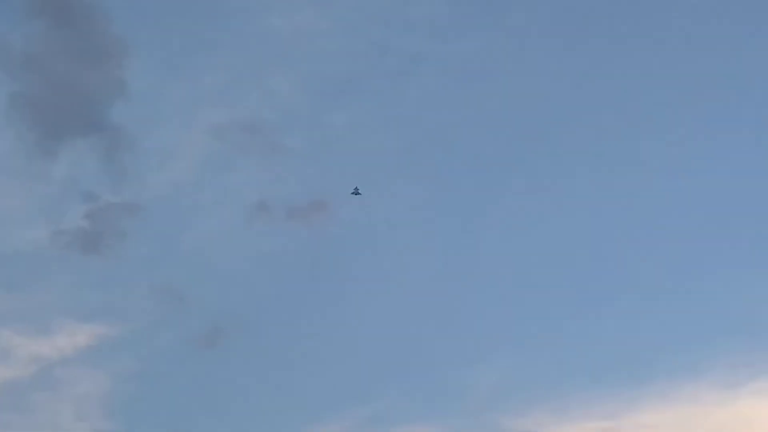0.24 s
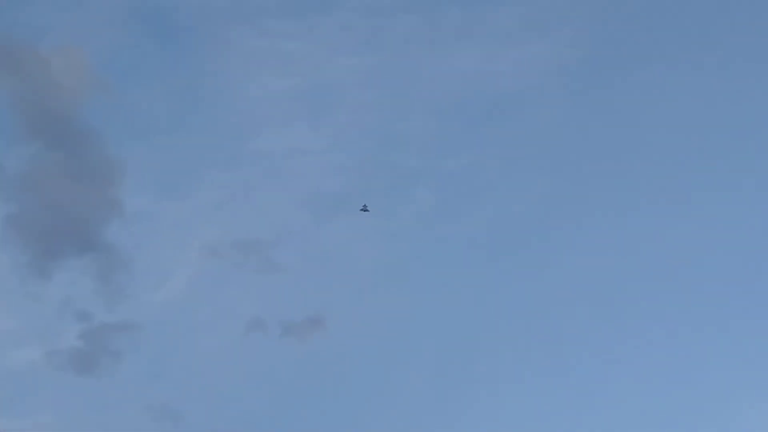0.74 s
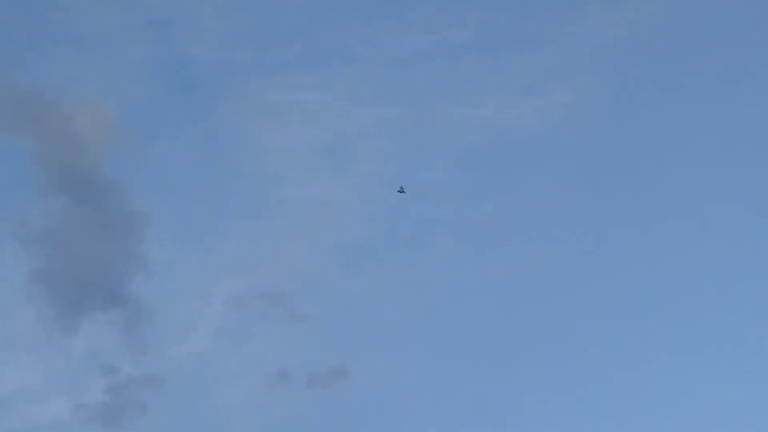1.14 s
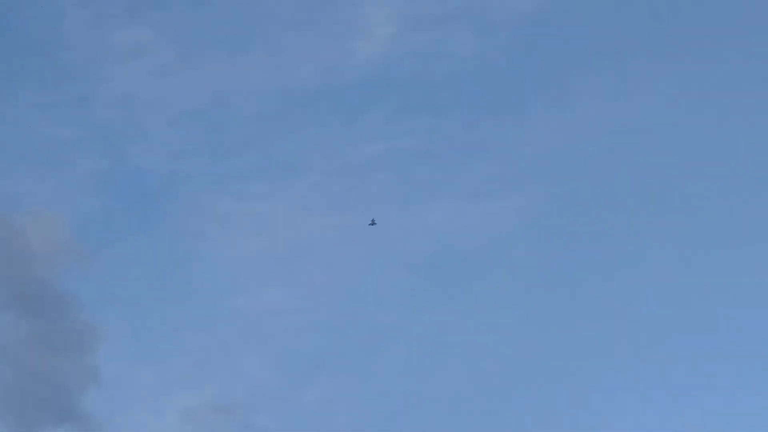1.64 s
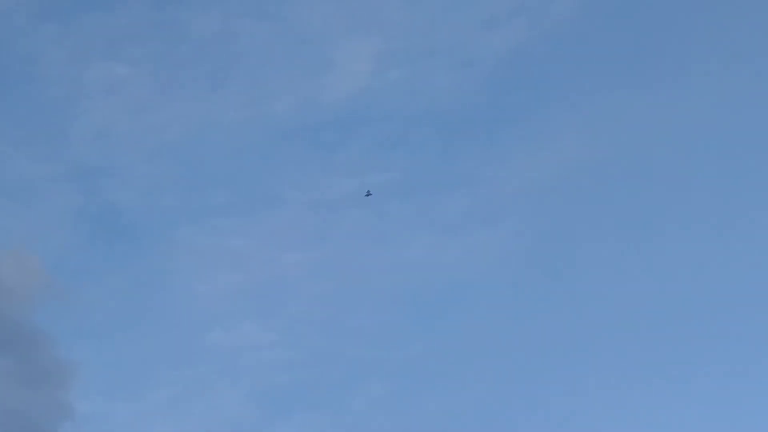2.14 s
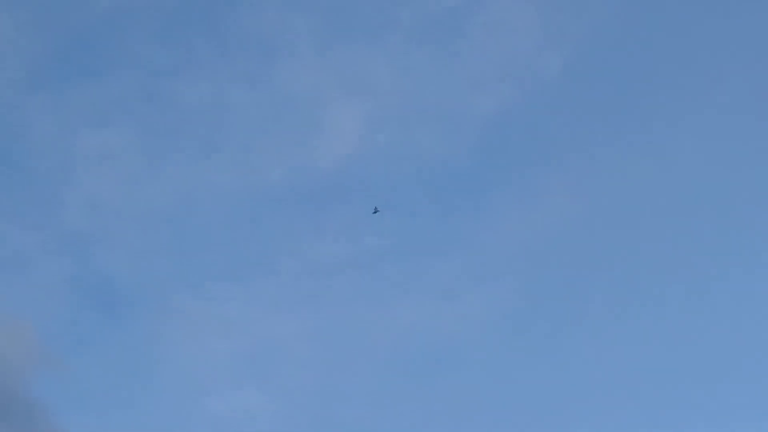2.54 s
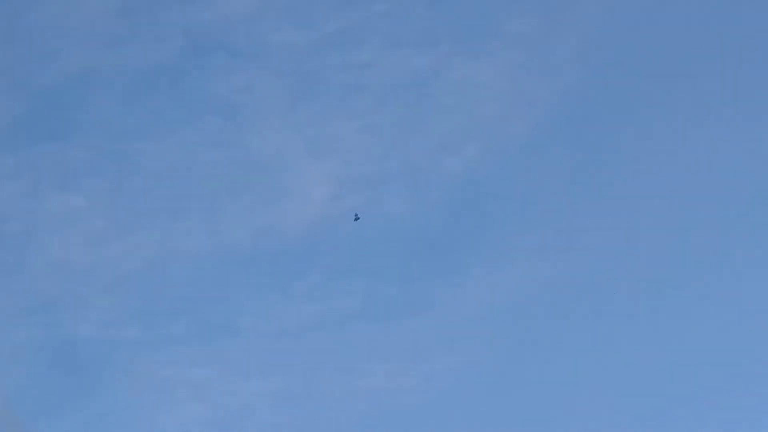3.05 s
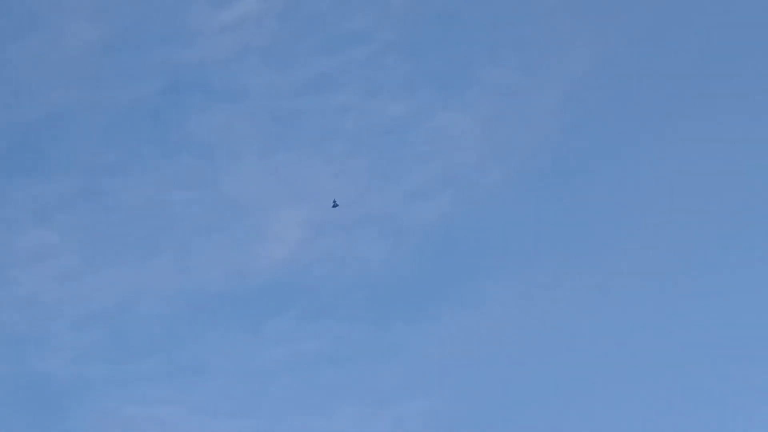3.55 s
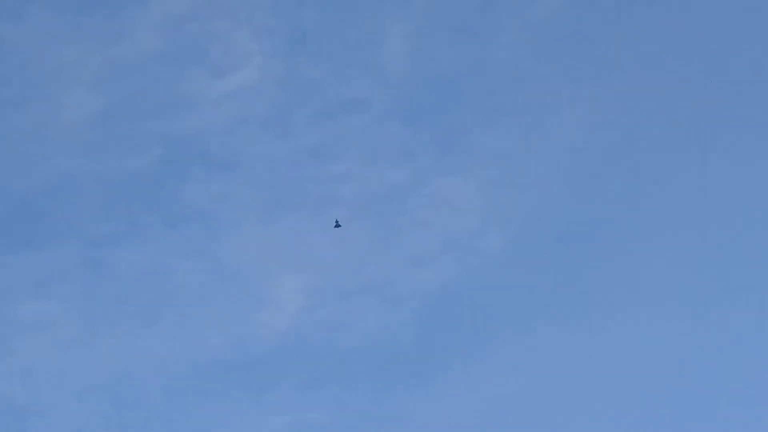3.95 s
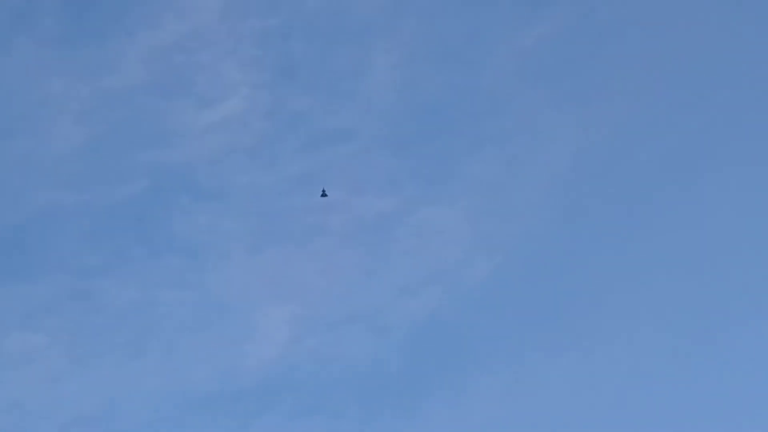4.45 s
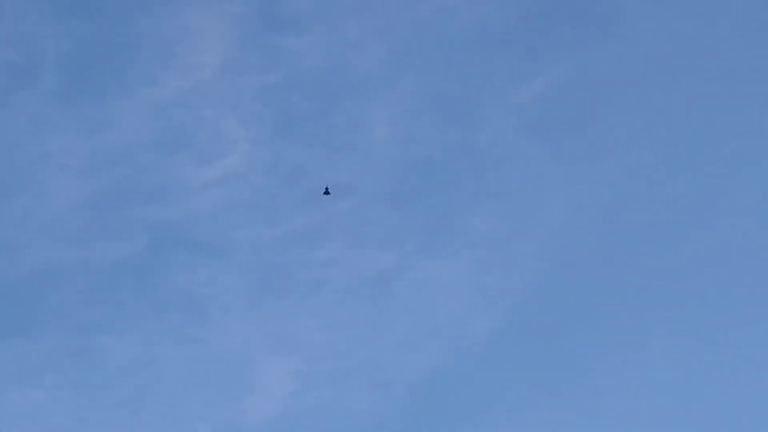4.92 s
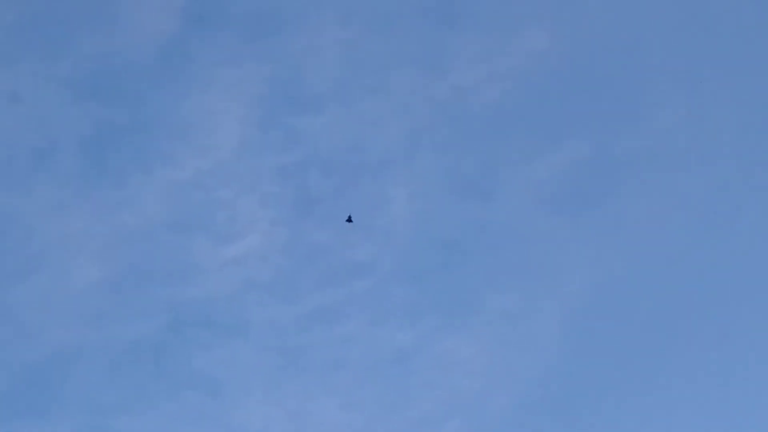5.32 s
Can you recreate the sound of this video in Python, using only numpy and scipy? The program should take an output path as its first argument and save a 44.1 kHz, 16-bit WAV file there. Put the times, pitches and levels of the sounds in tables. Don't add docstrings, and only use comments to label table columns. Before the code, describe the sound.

An electric ducted-fan model jet flies over an open field, heard from a ground camera in wide stereo. Bright hissing air and a steady whine come first; the tone thins midway, then sings out stronger and slightly higher as the hiss dulls. Wind rumbles throughout and thumps the microphone late, hardest at the end.

```python
import sys
import numpy as np
from scipy import signal
from scipy.fft import rfft, irfft, next_fast_len
from scipy.io import wavfile
from scipy.ndimage import uniform_filter1d, map_coordinates

SR = 44100
rng = np.random.default_rng(int(sys.argv[2]) if len(sys.argv) > 2 else 0)


def boost(x):
    u = np.asarray(x, float) / 20
    return 10 ** u


def bounce(signal):
    frames = np.transpose(np.atleast_2d(signal))
    limited = np.clip(frames, -1, 1)
    pcm = np.round(limited * 32767).astype(np.int16)
    wavfile.write(sys.argv[1], SR, pcm)


N = 245981


def unit(x):
    return x / np.sqrt(np.mean(x ** 2, axis=-1, keepdims=True) + 1e-20)


def along(points, hz):
    f, v = np.transpose(points)
    return np.interp(np.log(hz + 1), np.log(f + 1), v)


def curves(rows):
    s, *cols = np.transpose(rows)
    return [np.interp(np.arange(N) / SR, s, c) for c in cols]


def bumps(rows):
    t = np.arange(N) / SR
    total_db = np.zeros(N)
    for s, width, db in rows:
        total_db += db * np.exp(-((t - s) / width) ** 2)
    return total_db


def wobble(rate):
    knots = rng.standard_normal(int(N * rate / SR) + 4)
    return map_coordinates(knots, [np.arange(N) * rate / SR])


def filtered(x, response):
    m = next_fast_len(N + 8192)
    spectrum = rfft(x, m) * response(np.fft.rfftfreq(m, 1 / SR))
    return irfft(spectrum, m)[..., :N]


def coloured(channels, spectrum):
    return filtered(rng.standard_normal((channels, N)), lambda hz: boost(along(spectrum, hz)))


# (frequency [Hz], density [dB per Hz])
SELF_NOISE = [(3000, -7), (8000, 5), (12000, -4), (13500, -6), (14300, -10)]


def camera_noise():
    hiss = boost(-69) * unit(coloured(2, SELF_NOISE))
    whine = boost(-80) * np.sin(2 * np.pi * 10988 * np.arange(N) / SR)
    return hiss + [0 * whine, whine]


def jolts(table, cycles):
    port, t = np.zeros(N + SR), np.arange(-1500, 1500) / SR
    phases = rng.uniform(-0.7, 0.7, len(table))
    for (s, db, hz), phase in zip(table, phases):
        turns = hz * t * np.where(t > 0, 0.75, 1.25)
        swing = np.exp(-np.abs(turns / cycles) ** 1.06) * np.cos(2 * np.pi * turns + phase)
        start = round(s * SR) - 1500
        port[start:start + len(t)] += boost(db) * swing
    return port[:N]


# (frequency [Hz], density [dB per Hz])
RUMBLE = [(15, -13), (30, -4), (64, 0), (90, -2), (120, -5), (160, -10), (220, -16), (400, -32), (800, -70)]
# (time [s], level over calm [dB])
GUST = [(0, 5), (.5, -1), (1.75, 2), (2.05, 3.5), (2.55, 5), (3, 3), (3.4, 4.5), (3.8, -0.5), (4.4, 4.5),
        (5, 3.5), (5.58, 10)]
# (time [s], peak level [dB], swing frequency [Hz])
JOLTS_LEFT = [(3.123, -26, 97.5), (3.898, -29, 86), (4.225, -31, 77), (4.313, -29, 88), (4.325, -24, 63),
              (4.353, -27, 50), (4.376, -26, 82), (4.392, -19, 91), (4.48, -24, 92), (4.582, -26, 73),
              (4.633, -30, 94), (4.651, -23.5, 157), (4.801, -30, 113), (4.817, -22, 102),
              (4.845, -19.5, 96), (5.201, -25.5, 67), (5.289, -25.5, 76), (5.301, -26, 103),
              (5.347, -17.5, 101), (5.361, -27, 126), (5.385, -26, 103), (5.404, -20, 138),
              (5.429, -28, 97), (5.463, -23.5, 98), (5.479, -22, 124), (5.499, -13, 114),
              (5.525, -14.5, 164)]
JOLTS_RIGHT = [(3.13, -28, 140), (3.219, -28, 144), (4.029, -26, 90.5), (4.382, -30, 151), (4.395, -26, 92),
               (4.409, -22, 140), (4.564, -14.5, 162), (4.582, -26, 116), (4.828, -24, 81),
               (4.887, -30, 111), (4.938, -23, 144), (4.955, -27, 104), (4.967, -34, 108),
               (5.003, -28, 102)]


def wind():
    left, right, both = coloured(3, RUMBLE)
    lumps = boost(1.2 * np.array([wobble(23), wobble(25)]))
    gust_db, = curves(GUST)
    left_db = -49 + gust_db
    right_db = -49.5 + 0.1 * gust_db
    rumble = boost([left_db, right_db]) * unit(lumps * [left + 1.64 * both, right + 1.7 * both])
    return rumble + [jolts(JOLTS_LEFT, cycles=0.46), jolts(JOLTS_RIGHT, cycles=0.43)]


# (time [s], treble level [dB])
EXHAUST = [(0.0, -47.5), (0.09, -51), (0.26, -45.5), (0.39, -49), (0.7, -50), (0.78, -53), (0.88, -50.5),
           (1.94, -53.5), (2.49, -52.5), (2.64, -53.5), (2.8, -53), (3.4, -54.5), (3.87, -53.5),
           (4.02, -54), (4.27, -55), (5.3, -60), (5.56, -60.5), (5.58, -54)]


def facing():
    treble_db, = curves(EXHAUST)
    return treble_db - treble_db.mean()


# (frequency [Hz], correlation [-1..1])
ALIKE = [(150, 1), (500, 0.7), (1100, 0.57), (1700, 0.14), (2300, 0.16), (3400, 1), (4500, 0.79),
         (5600, 0.18), (7000, 0.77), (10000, 0.16), (13000, 0.072)]


def rush(spectrum, patchy_db):
    z = signal.stft(rng.standard_normal((2, N)), nperseg=512)[2]
    patches = uniform_filter1d(rng.standard_normal(z.shape[1:]), size=7, axis=0)
    patches = uniform_filter1d(patches, size=12, axis=1)
    pair = signal.istft(z * boost(patchy_db * patches / patches.std()), nperseg=512)[1][:, :N]

    def mid_side(hz):
        angle = np.arccos(np.clip(along(ALIKE, hz), -1, 1)) / 2
        return boost(along(spectrum, hz)) * [np.cos(angle), np.sin(angle)]

    mid, side = filtered(pair, mid_side)
    return unit(np.array([mid + side, mid - side]))


# (frequency [Hz], density [dB per Hz])
ROAR = [(120, 2.5), (250, 1), (400, 1), (800, -2), (1100, -10), (1500, -10.5), (2000, -19), (2600, -26),
        (4000, -27)]
HISS = [(900, -17.5), (1400, -4), (1700, -4), (2000, -2.5), (2500, -14), (3000, -7.5), (3700, -9),
        (4500, -0.5), (5400, -8), (6300, -1), (7000, 0), (7800, -12.5), (9000, -33)]
SIZZLE = [(6000, -8.5), (7800, -9), (8500, 6.5), (9400, 4.5), (10200, -4), (11500, -0.5), (12900, -2.5),
          (13600, -11), (13900, -27), (14300, -23)]
# (time [s], half width [s], roar rise [dB], sizzle rise [dB])
SURGES = [
    (0.2, 0.36, 2.5, 2),
    (.6, 0.12, -2.5, .5),
    (.95, 0.074, 1, -1),
    (1.85, 0.12, 3.5, 2),
    (2.1, 0.13, 1.5, 0.5),
    (2.45, 0.1, 2, 1),
    (3.7, 0.16, 1.5, 2),
    (4.45, 0.39, 0.5, 1),
    (5.4, .2, 2, -4),
]


def air():
    aim_db = facing()
    roar_db = -50.5 + 0.046 * aim_db + bumps([(s, w, db) for s, w, db, _ in SURGES])
    hiss_db = -55 + 1.03 * aim_db
    sizzle_db = -64.5 + 1.11 * aim_db + bumps([(s, w, db) for s, w, _, db in SURGES])
    swell = wobble(5.9)
    roar = boost(roar_db + 0.59 * wobble(9)) * rush(ROAR, patchy_db=0.9)
    hiss = boost(hiss_db + 0.21 * swell) * rush(HISS, patchy_db=1.4)
    sizzle = boost(sizzle_db + 1.74 * swell + 1.6 * wobble(12)) * rush(SIZZLE, patchy_db=-0.1)
    return roar + hiss + sizzle


# (frequency [Hz], left port over right [dB])
SHADOW = [(300, -3), (2000, 4), (2800, -18.5), (3600, 9), (4700, -2.5), (5500, -13.5), (6500, 11),
          (8000, -15.5), (9300, 13.5), (10500, -8.5), (13000, 3.5)]


def body_shadow(pair):
    return filtered(pair, lambda hz: boost(np.outer([0.5, -0.5], along(SHADOW, hz))))


# (time [s], frequency [Hz])
SPEED = [(0.0, 541.4), (0.4, 542.3), (0.8, 543.6), (1.2, 545.2), (1.6, 546.9), (2.0, 548.2), (2.4, 549.3),
         (2.8, 550.6), (3.2, 552.6), (3.6, 555.5), (4.0, 559.4), (4.4, 563.6), (4.8, 567.7), (5.2, 571.6),
         (5.58, 576.9)]
# (time [s], level [dB])
SHAFT = [(0.0, -38), (0.51, -41), (1.4, -39), (2.14, -43.5), (2.53, -48), (3.07, -42), (3.7, -33.5),
         (4.35, -32.5), (4.41, -34), (4.85, -36), (5.05, -34.5), (5.48, -40), (5.58, -43.5)]
# (time [s], left lead [rad], left excess [dB])
BEARING = [(0, -0.13, 3), (1.5, -0.31, 0), (3, -0.29, 1), (4, -0.28, 0), (5, -0.42, 1.5), (5.58, -0.32, 1)]
ORDER_DB = {2: -70.5, 3: -77, 6: -75.5, 11: -80.5, 12: -57, 13: -83.5, 24: -74}
ORDER_GROWS = {2: .01, 3: .01, 6: 0.69, 11: 1, 12: 0.99, 13: .5, 24: 2.6}
# (time [s], order, half width [s], rise [dB])
BEAMS = [(0.4, 2, 0.23, 9), (1.25, 2, 0.24, 6), (2.3, 2, 0.29, 3.5), (3.7, 2, 0.22, -12),
         (4.35, 2, 0.22, 2), (4.8, 2, 0.17, -15), (5.45, 2, 0.32, 8.5), (0.18, 3, 0.2, 11),
         (1.12, 3, 0.12, 9), (1.5, 3, 0.22, 9.5), (2.15, 3, 0.28, 7.5), (3.45, 3, 0.38, 12.5),
         (4.1, 3, 0.35, 11.5), (5.1, 3, 0.21, 8.5), (0.62, 12, .1, 4), (2.5, 12, 1.03, 5),
         (2.9, 12, 0.17, 1), (3.82, 12, 0.13, 6), (4.32, 12, 0.1, 7), (4.75, 12, 0.25, 4),
         (5.4, 12, 0.23, -4), (0.3, 11, 1.4, 6), (3.9, 11, .5, 9), (3.85, 13, .2, 12), (4.35, 13, 0.24, 15),
         (4.85, 13, 0.32, 17)]


def fan():
    shaft_db, = curves(SHAFT)
    aim_db = facing()
    turn = 2 * np.pi * np.cumsum(curves(SPEED)[0]) / SR
    ports = np.array([[1], [-1]])
    lead, excess_db = (ports * curve for curve in curves(BEARING))

    def level(count):
        lobes_db = bumps([(s, w, db) for s, n, w, db in BEAMS if n == count])
        return ORDER_DB[count] + ORDER_GROWS[count] * aim_db + lobes_db

    def order(db, flicker_db, lag, count):
        flicker = flicker_db * (wobble(25) + 0.39 * np.array([wobble(6.3), wobble(6.4)]))
        jitter = 0.042 * flicker_db * wobble(33)
        return np.sqrt(2) * boost(db + flicker) * np.sin(count * turn + lag + jitter)

    def chopped(db, width_hz, lag, count):
        inflow = unit(filtered(rng.standard_normal(N), lambda hz: 1 / (1 + (hz / width_hz) ** 2)))
        return boost(db) * inflow * np.sin(count * turn + lag)

    shaft = order(shaft_db - 1.5, 0.34, ports * (0.065 + 0.018 * wobble(3.35)), count=1)
    second = order(level(2), 2.5, 0, count=2)
    third = order(level(3), 1.8, 0.46 * ports, count=3)
    sixth = order(level(6), 0.91, 0, count=6)
    blade_db, twice_db = level(12), level(24)
    blade = order(blade_db + excess_db, 1.7, lead, count=12)
    blade = blade + chopped(blade_db - 2, 260, lead, count=12)
    beside = order(level(11), 1.9, lead, count=11) + order(level(13), 2.7, -lead, count=13)
    twice = order(twice_db - 15, 3.9, 2.5 * ports, count=24)
    twice = twice + chopped(twice_db, 350, 1.2 * ports, count=24)
    return shaft + second + third + sixth + blade + beside + twice


def scene():
    return wind() + body_shadow(air()) + fan()


# (frequency [Hz], share of the other port taken away)
CROSS = [(60, .77), (300, .75), (1100, .85), (2300, .79), (3400, .9), (4500, .7), (5600, .75), (6500, .6),
         (8000, .4), (11000, .45), (13300, .48)]


def crossed_copy(pair):
    delay, lead = 1 / 2205, 0.27

    def response(hz):
        phase = lead * hz / (hz + 500) - 2 * np.pi * hz * delay
        return along(CROSS, hz) * np.exp(1j * phase)

    return filtered(pair[::-1], response)


def low_pass(x):
    return signal.sosfilt(signal.butter(12, 14250, fs=SR, output="sos"), x)


def record(dry):
    mix = dry - crossed_copy(dry) + camera_noise()
    return low_pass(mix)


dry = scene()
out = record(dry)
bounce(out)
```